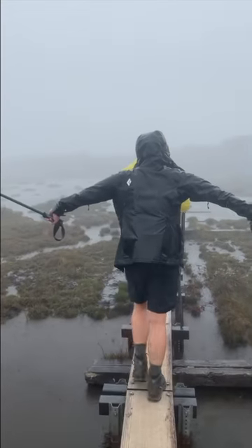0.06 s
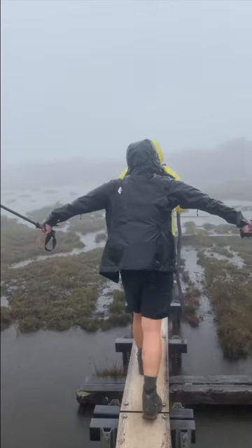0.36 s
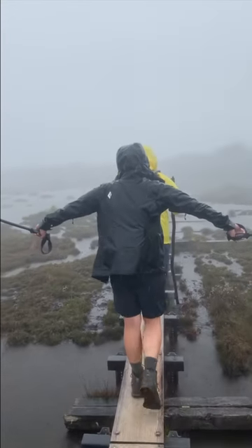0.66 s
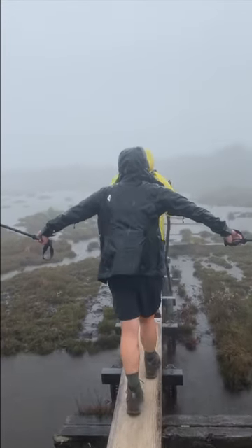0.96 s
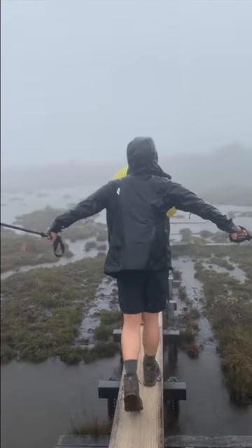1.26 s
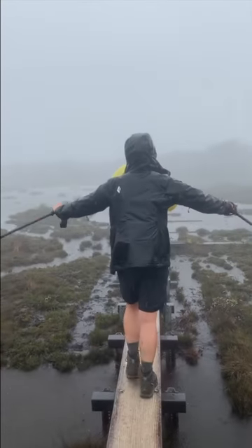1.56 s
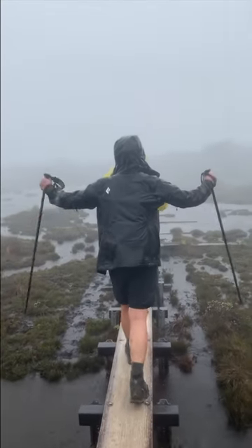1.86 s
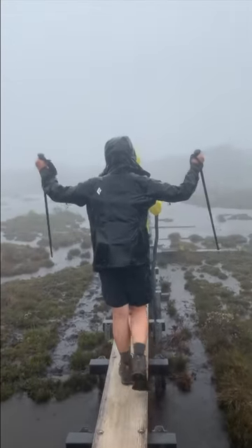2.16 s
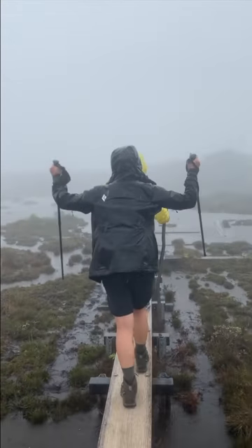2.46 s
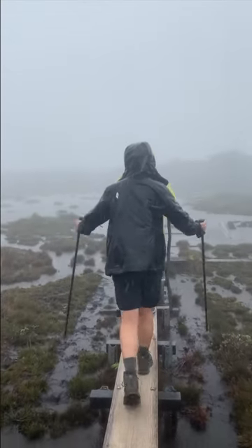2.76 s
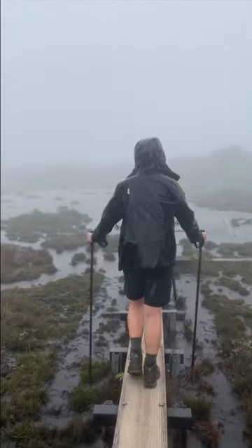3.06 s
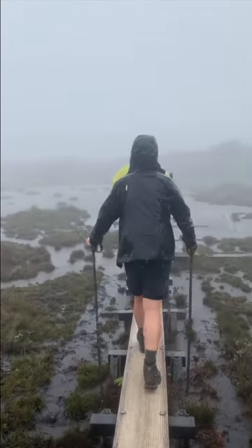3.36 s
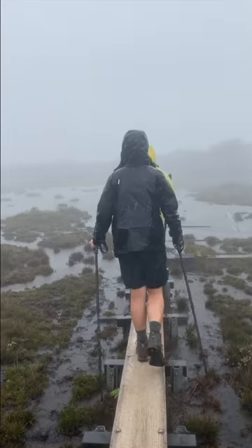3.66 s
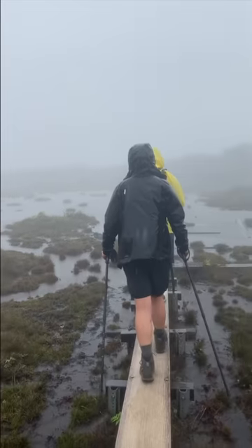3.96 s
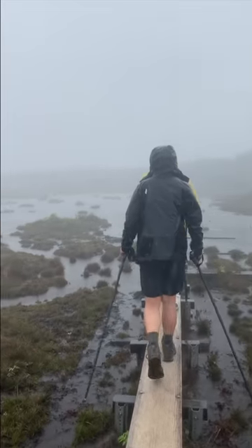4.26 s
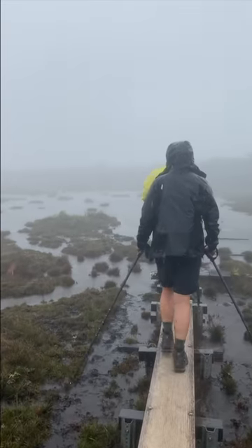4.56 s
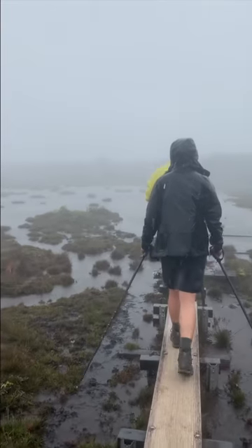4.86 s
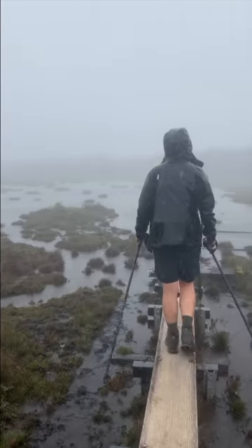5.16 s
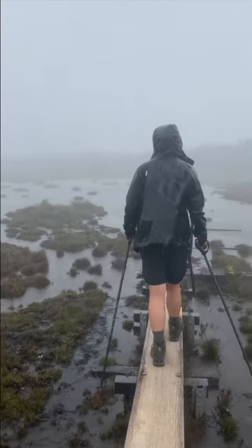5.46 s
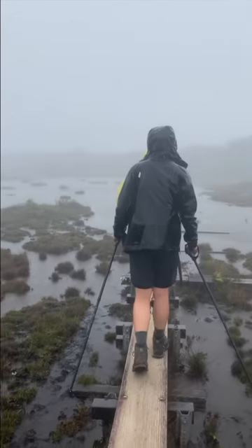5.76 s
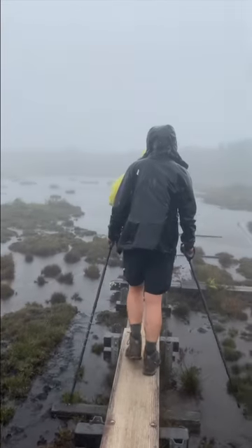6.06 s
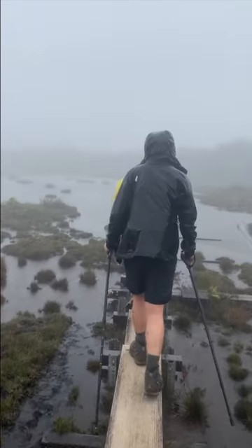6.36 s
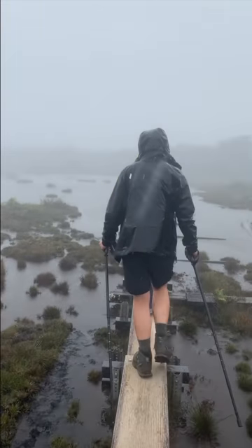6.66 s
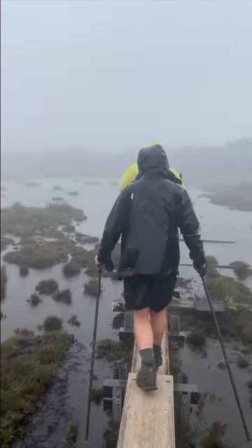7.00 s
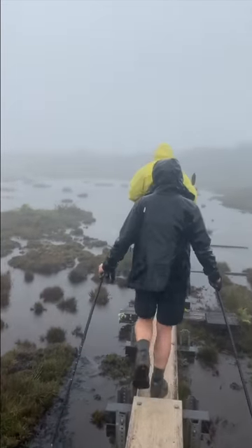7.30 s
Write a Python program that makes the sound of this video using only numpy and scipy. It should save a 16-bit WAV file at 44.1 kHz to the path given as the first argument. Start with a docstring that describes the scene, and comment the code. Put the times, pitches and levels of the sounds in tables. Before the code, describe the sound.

Close raindrops tap and crackle on a jacket and hood over a distant rain hiss, as low wind gusts build late.

```python
"""Rain on a marsh boardwalk.

Steady rain, heard from the hand-held camera of a walker in a waterproof jacket. Far off it hisses on
the water; close by it patters on jacket and hood, and some drops hit the camera as taps, thuds and
ticks. A plank knocks twice and sleeves brush; gusts buffet the microphone, hardest near the end."""
import sys
import numpy as np
from scipy.fft import rfft, irfft, next_fast_len
from scipy.io import wavfile
from scipy.ndimage import map_coordinates

SR = 44100
rng = np.random.default_rng(int(sys.argv[2]) if len(sys.argv) > 2 else 0)


def store_pcm(level_fs):
    """Save levels as 16-bit WAV."""
    pcm = np.round(np.clip(level_fs, -1, 1) * 32767).astype(np.int16)
    wavfile.write(sys.argv[1], SR, np.atleast_2d(pcm).T)


N = 323253
EVENT_SAMPLES = 8192  # room for one drop, knock or eddy


def amp(db):
    """Decibels to gain."""
    return 10 ** (np.asarray(db) / 20)


def unit(x):
    """x at rms 1."""
    return x / np.sqrt(np.mean(x ** 2) + 1e-20)


def along(points, hz):
    """(Hz, value) points read on a log axis."""
    knots_hz, values = np.transpose(points)
    return np.interp(np.log(hz + 1), np.log(knots_hz + 1), values)


def curve(rows):
    """(seconds, value) rows as one value per sample."""
    return np.interp(np.arange(N) / SR, *np.transpose(rows))


def wobble(rate):
    """A smooth random curve, rate knots a second."""
    knots = rng.standard_normal(int(N * rate / SR) + 4)
    return map_coordinates(knots, [np.arange(N) * rate / SR])


def filtered(x, response):
    """x through a complex frequency response."""
    size = next_fast_len(N + SR // 2)
    return irfft(rfft(x, size) * response(np.fft.rfftfreq(size, 1 / SR)), size)[..., :N]


def bell(hz, centre_hz, octaves):
    """A smooth resonance hump on a log axis."""
    return np.exp(-.5 * (np.log2((hz + 1) / centre_hz) / octaves) ** 2)


def add(track, start_s, sound):
    """Mix a sound into a track from start_s."""
    i = round(start_s * SR)
    part = sound[..., max(-i, 0):N - i]
    track[..., max(i, 0):max(i, 0) + part.shape[-1]] += part


def far_rain(ahead=0.1, fizz_hz=5500):
    """Countless drops on distant water merge into a fluttering wash under steadier fizz: (mid, side)."""
    # Rain out on the marsh. Each row: time in seconds, relative level in dB.
    levels = [(0.1, -58), (0.93, -56), (5.0, -54.5), (7.2, -56.5)]
    # Spectrum of its hiss. Each row: frequency in Hz, relative level in dB.
    spectrum = [(60, 8), (250, 5), (600, 6.5), (1100, 8.5), (1700, 13.5), (2400, 4.5), (3400, 4.5),
                (4300, 0), (6500, -1.5), (8500, -3), (9700, -6), (12200, 0), (13700, -4), (14500, -16)]
    mid, diffuse = rng.standard_normal((2, N))
    side = ahead * mid + np.sqrt(1 - ahead ** 2) * diffuse
    hiss = unit(filtered(np.array([mid, side]), lambda hz: amp(along(spectrum, hz))))
    wash = filtered(hiss, lambda hz: 1 / (1 + (hz / fizz_hz) ** 6))
    fizz = hiss - wash
    return amp(curve(levels) + 12) * (amp(2.4 * wobble(24)) * wash + amp(1.2 * wobble(24)) * fizz)


def cloth_patter(per_s, spread_db, octaves, span_hz, ahead, bands):
    """Small impacts on cloth, each ringing briefly at the pitch of its spot: (mid, side) at rms 1."""
    # Spectrum of the struck cloth. Each row: frequency in Hz, relative level in dB.
    spectrum = [(100, -21), (300, -9), (600, -0.5), (1100, 3), (1500, 4.5), (1900, 0), (2400, -5.5),
                (3400, -2), (4200, -8.5), (5200, -7.5), (7000, -10), (10000, -37), (13000, -44)]
    patter = np.zeros((2, N))
    for centre_hz in np.geomspace(*span_hz, bands):
        sizes = amp(spread_db * np.minimum(rng.standard_normal(N), 2)) * rng.choice([-1, 1], N)
        hits = sizes * (rng.random(N) < per_s / bands / SR)
        # hits from ahead share one side weight; those from all round get a random one
        sideways = ahead + np.sqrt(1 - ahead ** 2) * rng.standard_normal(N)
        patter += filtered(np.array([hits, hits * sideways]), lambda hz: bell(hz, centre_hz, octaves))
    return unit(filtered(patter, lambda hz: amp(along(spectrum, hz))))


def jacket_rain():
    """On the jacket fine drops crackle, fast ones snap, fat ones pat; slack folds plop and thump."""
    # Rain on the jacket, close to the microphone. Each row: time in seconds, relative level in dB.
    levels = [(0.0, -49.5), (0.1, -48), (0.2, -53.5), (0.85, -52), (1.15, -50), (1.5, -53), (1.63, -46),
              (1.75, -49), (2.04, -42.5), (2.35, -49.5), (2.55, -46.5), (2.92, -45.5), (3.43, -46.5),
              (3.7, -48), (4.2, -49.5), (4.63, -45.5), (5.0, -52), (5.2, -51), (5.42, -43.5), (5.55, -46.5),
              (6.0, -50), (6.37, -48), (6.7, -51.5), (7.04, -47.5), (7.33, -52.5)]
    crackle = cloth_patter(per_s=500, spread_db=3, octaves=0.65, span_hz=(1170, 4900), ahead=0.5, bands=5)
    snaps = cloth_patter(per_s=65, spread_db=-1, octaves=0.5, span_hz=(1550, 3770), ahead=0.58, bands=2)
    pats = cloth_patter(per_s=140, spread_db=1, octaves=0.07, span_hz=(1020, 3720), ahead=0.76, bands=16)
    plops = cloth_patter(per_s=46, spread_db=4, octaves=0.19, span_hz=(496, 920), ahead=0.18, bands=4)
    thumps = cloth_patter(per_s=27, spread_db=1, octaves=0.57, span_hz=(228, 404), ahead=0.41, bands=2)
    clusters = amp(1.1 * wobble(24) + 2.2 * wobble(70))
    cloth = amp(2.5) * crackle + amp(-6) * snaps + amp(0.5) * pats
    return amp(curve(levels)) * (clusters * cloth + amp(-8) * plops + amp(-10.5) * thumps)


def gust_strength(rise_s=0.045, fall_s=0.07, breeze_db=-60):
    """Wind strength as a gain: each gust rises, holds and falls back to the breeze."""
    # Gusts at the microphone. Each row: start of the hold and its length in seconds, level in dB.
    gusts = [(0, 0.16, -42.5), (0.33, 0.17, -40.5), (0.6, 0.68, -43.5), (1.504, 0.82, -52),
             (2.512, 0.33, -43.5), (3.082, 0.34, -43.5), (3.5, 1.0, -49.5), (4.907, 0.2, -51),
             (5.402, .08, -48), (6.03, .07, -41), (6.19, 0.2, -37.5), (6.41, 0.08, -33.5),
             (6.562, 0.11, -33), (6.7, 0.24, -37.5), (6.96, .18, -35), (7.286, .05, -39.5)]
    t = np.arange(N) / SR
    swells = [amp(db) * np.exp(np.minimum(t - start, 0) / rise_s - np.maximum(t - start - hold, 0) / fall_s)
              for start, hold, db in gusts]
    return np.maximum(amp(breeze_db), np.max(swells, axis=0))


def wind(split_hz=66, even_db=-44, slap_s=0.0085):
    """Eddies push on the microphone, alike in both channels; stronger gusts shed more small ones."""
    # Spectrum of the wind rumble. Each row: frequency in Hz, relative level in dB.
    spectrum = [(15, -52), (28, -22), (45, 3), (60, -1), (77, -3.5), (110, -12), (180, -18.5), (300, -28.5),
                (600, -76), (1500, -96)]
    # Big eddies that slap the microphone. Each row: middle in seconds, peak in dB, pitch in Hz.
    buffets = [(0.08, -34.5, 65), (0.142, -29.5, 96), (0.388, -27.5, 66), (0.655, -31.5, 60),
               (2.795, -27, 63), (3.31, -31.5, 53), (6.211, -18.5, 75), (6.246, -19, 73.6), (6.47, -28, 72),
               (6.547, -17, 95), (6.569, -13, 82), (6.728, -21.5, 96), (6.821, -25, 70), (7.011, -21, 86),
               (7.061, -22, 77), (7.226, -23, 67.7)]
    eddies = unit(filtered(rng.standard_normal(N), lambda hz: amp(along(spectrum, hz))))
    large = filtered(eddies, lambda hz: 1 / (1 + (hz / split_hz) ** 4))
    small = eddies - large
    strength = gust_strength()
    brightness = (strength / amp(even_db)) ** 0.97
    lumps = amp(2 * wobble(16))
    rumble = strength * lumps * (large / np.maximum(brightness, 1) + small * brightness)
    t = (np.arange(EVENT_SAMPLES) - EVENT_SAMPLES / 2) / SR
    for middle_s, db, pitch_hz in buffets:
        swing = np.sin(2 * np.pi * (pitch_hz * t + rng.random())) * np.exp(-(t / slap_s) ** 2)
        add(rumble, middle_s + t[0], amp(db) * swing)
    return rumble


def strikes(rows, colour, splash_db, splash_t60, side_db, lead_s, gain_db):
    """Each drop is one push and a short splash, shaped by colour(Hz, its last column): (mid, side)."""
    out = np.zeros((2, N))
    t = np.arange(EVENT_SAMPLES) / SR
    hz = np.fft.rfftfreq(EVENT_SAMPLES, 1 / SR)
    for time_s, db, tone in rows:
        response = colour(hz, tone)
        splash = rng.standard_normal((2, EVENT_SAMPLES)) * amp(-60 * t / splash_t60)
        force = (t == 0) + amp(splash_db) * splash / np.linalg.norm(splash[0])
        blow = np.fft.fftshift(irfft(rfft(force) * response), axes=-1)
        blow *= amp([[0], [side_db]]) / np.abs(blow).max(axis=1, keepdims=True)
        add(out, time_s - lead_s - EVENT_SAMPLES / SR / 2, amp(db + gain_db) * blow)
    return out


def shell_taps():
    """Drops ring the camera's shell; the treble leads and the bass trails, making a dry, falling plop."""
    # Drops on the shell. Each row: time in seconds, relative peak in dB, pitch in Hz.
    taps = [(0.024, -29, 820), (0.044, -32, 1050), (0.240, -33.5, 1050), (0.475, -24, 765),
            (0.558, -36, 696), (0.823, -33, 840), (1.25, -31, 750), (1.352, -27, 1020), (1.359, -19, 750),
            (1.369, -36, 550), (1.688, -29.5, 770), (1.744, -31.5, 910), (1.910, -28, 735),
            (2.193, -21, 830), (2.268, -28.5, 764), (2.385, -25, 834), (2.457, -22.5, 864),
            (2.593, -34, 950), (2.660, -27, 810), (2.785, -28.5, 880), (2.808, -21, 770),
            (2.982, -26.5, 760), (2.999, -21.5, 750), (3.041, -28, 990), (3.055, -23.5, 837),
            (3.092, -21.5, 724), (3.097, -21, 870), (3.145, -28.5, 660), (3.692, -28.5, 746),
            (3.789, -29, 790), (3.930, -23.5, 840), (3.945, -21, 860), (4.316, -30, 720),
            (4.418, -29.5, 860), (4.474, -28, 845), (4.677, -32.5, 780), (4.815, -30, 724),
            (4.875, -30, 910), (5.022, -21.5, 810), (5.032, -23, 780), (5.132, -34, 750), (5.268, -35, 780),
            (5.393, -38, 855), (5.409, -23, 740), (5.455, -30, 815), (5.487, -21.5, 790), (5.636, -29, 750),
            (5.749, -33, 630), (5.796, -30.5, 850), (5.916, -29, 796), (6.038, -36, 690), (6.144, -29, 890),
            (6.553, -31, 706), (6.705, -23.5, 780), (7.07, -30, 557), (7.078, -32, 563)]

    def shell(hz, pitch_hz):
        ring = bell(hz, pitch_hz, octaves=rng.uniform(0.16, 0.4))
        skirt = amp(-10) * bell(hz, 0.8 * pitch_hz, octaves=0.61)
        lag_cycles = 2.3 * rng.random()
        return (ring + skirt) * np.exp(-2j * np.pi * lag_cycles * (np.log(hz + 1) - hz / pitch_hz))

    return strikes(taps, shell, splash_db=-4, splash_t60=0.04, side_db=-4, lead_s=0.00057, gain_db=0.5)


def hood_pats():
    """Fat drops land on the hood, each a round pat with a short splash."""
    # Drops on the hood. Each row: time in seconds, relative peak in dB, pitch in Hz.
    pats = [(0.0757, -33, 1700), (0.1161, -25, 1740), (0.162, -32.5, 1750), (0.294, -31, 1900),
            (0.492, -34, 1420), (0.585, -31, 1350), (0.6574, -32, 2950), (0.9038, -15.5, 1500),
            (1.027, -45, 1770), (1.104, -29, 1870), (1.237, -38, 1980), (1.364, -26.5, 3240),
            (1.5778, -31, 3230), (1.646, -26, 1870), (1.659, -30, 1700), (1.7404, -31, 3210),
            (1.753, -39, 2020), (1.816, -34, 1790), (1.8635, -24.5, 2150), (1.946, -28, 1460),
            (1.978, -27, 1550), (2.0268, -24, 2450), (2.0445, -31, 1400), (2.160, -31, 1590),
            (2.1735, -24, 1600), (2.1904, -19.5, 1810), (2.209, -25, 1690), (2.254, -29, 1460),
            (2.436, -24, 1550), (2.534, -28, 1590), (2.468, -31, 4400), (2.5815, -26.5, 3450),
            (2.738, -33, 3220), (2.817, -25, 1290), (2.8968, -32, 3710), (2.913, -29, 3700),
            (3.0644, -25, 1900), (3.0885, -22.5, 3800), (3.138, -32, 1700), (3.164, -34, 1460),
            (3.351, -26, 1940), (3.4475, -26, 2100), (3.61, -27.5, 3400), (3.645, -28, 1470),
            (3.705, -25, 1840), (3.830, -35, 1420), (3.9115, -33, 3720), (4.357, -37, 1650),
            (4.814, -26.5, 1460), (4.910, -32, 1850), (4.9935, -29, 3400), (5.068, -30, 1420),
            (5.151, -33, 1420), (5.474, -28, 1270), (5.872, -30, 1930), (5.9095, -28, 3080),
            (5.971, -30, 2460), (6.038, -33, 1960), (6.234, -40, 1280), (6.301, -30, 1360),
            (6.3535, -25, 1490), (6.406, -30, 1420), (6.6662, -27, 3550), (6.697, -30, 3170),
            (6.8275, -25, 1620), (6.901, -26.5, 1760), (7.0579, -26.5, 3750), (7.165, -29, 1980)]
    return strikes(pats, lambda hz, pitch_hz: bell(hz, pitch_hz, octaves=0.33),
                   splash_db=-5, splash_t60=0.035, side_db=1.5, lead_s=-0.000092, gain_db=3)


def camera_thuds(sway_hz=60, sway_width_hz=16):
    """Heavy drops jolt the camera into a low ring: the heavier the drop, the deeper its thud."""
    # Heavy drops on the camera. Each row: time in seconds, relative peak in dB.
    thuds = [(0.149, -31.5), (0.302, -47), (0.376, -42), (0.425, -41), (0.473, -32.5), (0.906, -8.5),
             (0.997, -38), (1.104, -37.5), (1.441, -38), (2.099, -46), (3.052, -34), (3.521, -38),
             (4.102, -31.5), (4.42, -35.5), (4.455, -38), (4.506, -30), (5.406, -38), (5.482, -35.5),
             (6.016, -41), (6.146, -19.5), (6.256, -28.5), (6.85, -34.5), (6.898, -33.5), (7.009, -33.5),
             (7.219, -40.5), (7.288, -37.5)]
    # Spectrum of a jolt. Each row: frequency in Hz, relative level in dB.
    spectrum = [(8, -75), (28, -22), (70, 0.5), (150, -2), (350, -5.5), (480, -11), (680, -18.5),
                (1200, -35), (3000, -115)]

    def jolt(hz, weight_db):
        tilt_db_per_octave = np.interp(weight_db, [-19, -7], [-6, 1.9])  # the heaviest strike harder
        edge_hz = np.interp(weight_db, [-32, -7], [220, 30])
        low_cut = hz ** 2 / (hz ** 2 + edge_hz ** 2)
        damping = 1j * hz * sway_width_hz
        sway = 1 + amp(3) * damping / (sway_hz ** 2 - hz ** 2 + damping)
        return amp(along(spectrum, hz) + tilt_db_per_octave * np.log2(hz + 1)) * sway * low_cut

    weighed = [(time_s, db, db) for time_s, db in thuds]  # the level also sets the tone
    return strikes(weighed, jolt, splash_db=-8, splash_t60=0.008, side_db=-22, lead_s=0.00097, gain_db=8.5)


def port_ticks():
    """Fine drops burst right at the microphone ports as bright, broad ticks."""
    # Drops at the ports. Each row: time in seconds, relative peak in dB, centre frequency in Hz.
    ticks = [(0.8081, -27, 9000), (1.042, -35, 11000), (1.1029, -32.5, 5460), (1.3548, -23.5, 6940),
             (1.4436, -29, 11000), (1.6871, -34, 13000), (2.1897, -18, 7300), (2.2645, -24.5, 8000),
             (2.322, -32, 9000), (2.6848, -32, 12100), (2.9092, -19, 9100), (2.9292, -30, 12000),
             (3.0874, -23, 3660), (3.0928, -26, 11000), (3.2505, -35, 13100), (3.4183, -25, 11100),
             (3.6102, -27.5, 4900), (3.688, -27, 9000), (3.989, -28, 4900), (4.8715, -29, 11000),
             (4.8953, -32, 13100), (5.227, -28.5, 6000), (5.4839, -26, 8000), (5.5358, -39, 13000),
             (5.5543, -29.5, 4440), (6.0257, -35, 13000), (6.6273, -30, 6400), (6.8274, -28.5, 6400),
             (7.0648, -26, 8000), (7.0883, -31, 11000)]
    return strikes(ticks, lambda hz, centre_hz: bell(hz, centre_hz, octaves=2.5),
                   splash_db=-2, splash_t60=0.007, side_db=0, lead_s=-0.0005, gain_db=9.7)


def plank_knocks(attack_s=0.0023, lead_s=0.0033, gain_db=4):
    """A knock rings the wet board's few modes; a soft contact leaves out the higher ones: (mid, side)."""
    # Knocks on the boardwalk. Each row: time in seconds, relative peak in dB, contact cutoff in Hz.
    knocks = [(1.202, -21.5, 1800), (3.863, -24, 150)]
    # The plank's modes. Each row: frequency in Hz, relative level in dB, seconds to fall by 60 dB.
    modes = [(189, -3.5, 0.072), (259, -1, 0.046), (300, -3.5, 0.052), (400, -12, 0.036), (774, -5, 0.063),
             (1420, -1, 0.034)]
    out = np.zeros((2, N))
    t = np.arange(EVENT_SAMPLES) / SR
    for time_s, db, contact_hz in knocks:
        ring = np.zeros(EVENT_SAMPLES)
        for hz, mode_db, t60 in modes:
            decay = amp(mode_db + rng.normal() - 60 * t / t60)
            ring += decay * np.sin(2 * np.pi * hz * t) / (1 + (hz / contact_hz) ** 2)
        ring *= 1 - np.exp(-t / attack_s)
        add(out, time_s - lead_s, amp(db + gain_db) * ring / np.abs(ring).max())
    return out


def sleeves():
    """Wet cloth slides on cloth: each stroke is a dense run of tiny slips that swells and fades."""
    # Sleeves brushing the jacket. Each row: middle and half-width in seconds, level in dB, pitch in Hz.
    strokes = [(1.97, 0.012, -40.5, 4000), (2.05, 0.09, -40.5, 2600), (4.545, 0.03, -42.5, 3900),
               (4.62, 0.032, -37.5, 2300), (4.71, 0.05, -39, 2400), (5.99, 0.03, -39, 2700)]
    out = np.zeros((2, N))
    t = np.arange(N) / SR
    for middle_s, half_width_s, db, hz in strokes:
        slips = cloth_patter(per_s=1400, spread_db=-1, octaves=0.54, span_hz=(hz, hz), ahead=0.45, bands=1)
        out += amp(db) * np.exp(-((t - middle_s) / half_width_s) ** 2) * slips
    return out


def microphone(mid_side, lag_cycles=1.8, lag_knee_hz=28.3):
    """Two ports turn (mid, side) into left and right; low pitches lag longer, so blows chirp downwards."""
    # Phase between the ports. Each row: frequency in Hz, lead of left over right in radians.
    port_phase = [(250, 0), (500, .85), (780, 1.25), (1050, 1.95), (1230, 2.45), (1500, 2.4), (2000, 2.2),
                  (2400, 2.25), (3300, 1.95), (3900, 1.55), (4700, 2), (5600, 1.6), (6200, 1.1), (6700, .2),
                  (7400, .15), (7700, .8), (8500, 1.5), (9300, 2.7), (10200, 3.6), (11000, 4.7), (11700, 6),
                  (12900, 6.5), (13300, 7.5), (14300, 8.8)]

    def ports(hz):
        apart = hz ** 6 / (hz ** 6 + 420 ** 6)  # long waves reach both ports alike
        half_phase = apart * along(port_phase, hz) / 2
        lag = np.exp(-2j * np.pi * lag_cycles * np.log(hz + lag_knee_hz))
        turn = 1j * np.exp(1j * np.interp(hz, [850, 1150], [2.9, 0]))  # the shell is louder on the right
        return lag * np.array([np.cos(half_phase), turn * np.sin(half_phase)])

    mid, side = filtered(mid_side, ports)
    return np.array([mid + side, mid - side])


def scene():
    """Rain far and near, single drops, plank and sleeves reach the two ports; the wind rumbles on top."""
    rain = far_rain() + jacket_rain()
    blows = shell_taps() + camera_thuds() + port_ticks() + hood_pats() + plank_knocks()
    rumble = wind()
    return microphone(rain + sleeves() + blows) + rumble


def record(dry):
    """The camera keeps nothing above its band limit."""
    return filtered(dry, lambda hz: hz < 14600)


dry = scene()
out = record(dry)
store_pcm(out)
```